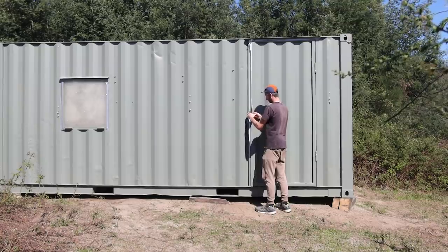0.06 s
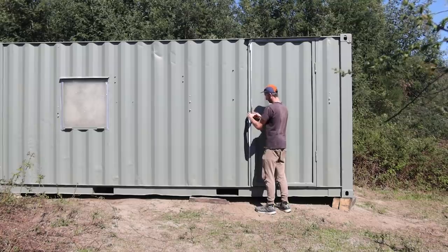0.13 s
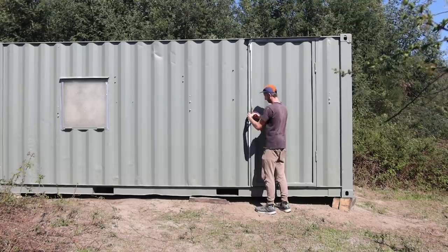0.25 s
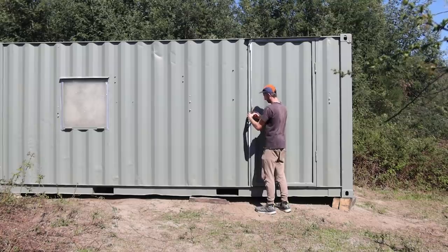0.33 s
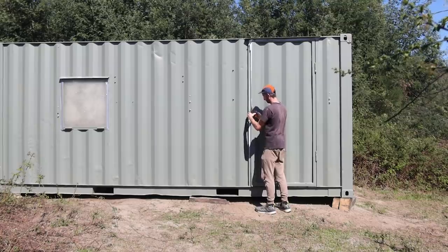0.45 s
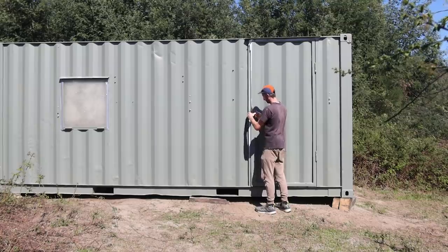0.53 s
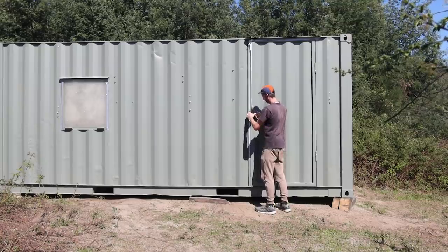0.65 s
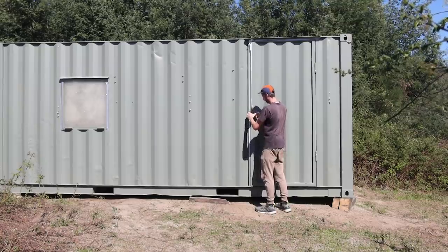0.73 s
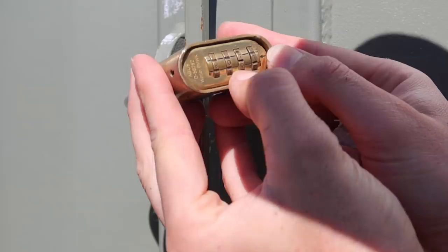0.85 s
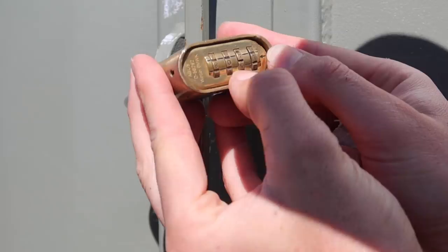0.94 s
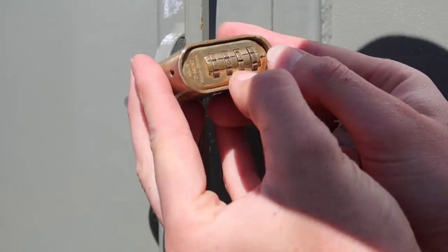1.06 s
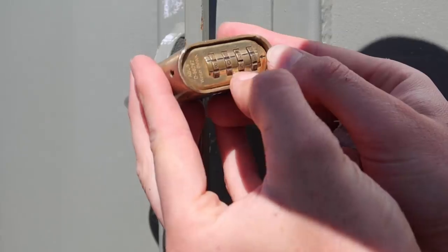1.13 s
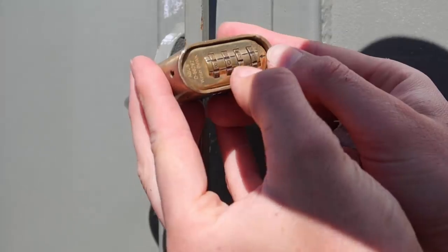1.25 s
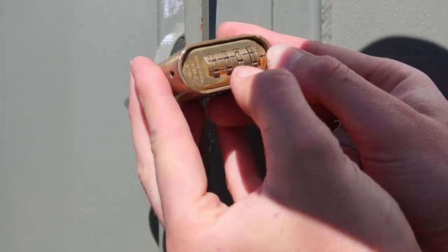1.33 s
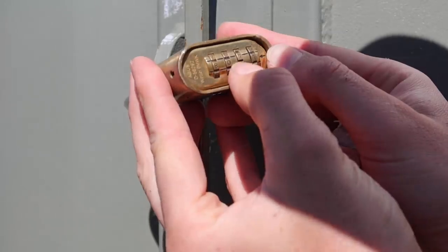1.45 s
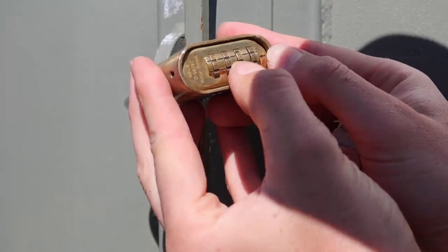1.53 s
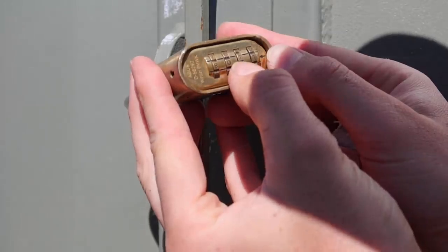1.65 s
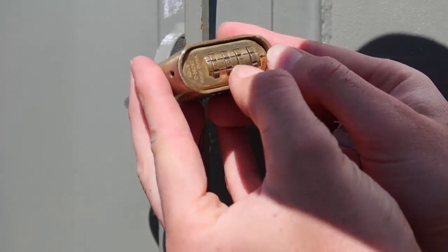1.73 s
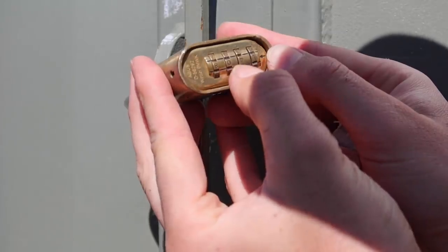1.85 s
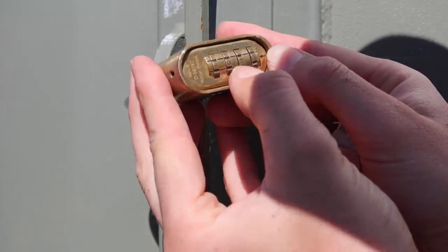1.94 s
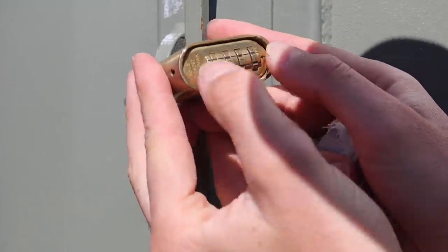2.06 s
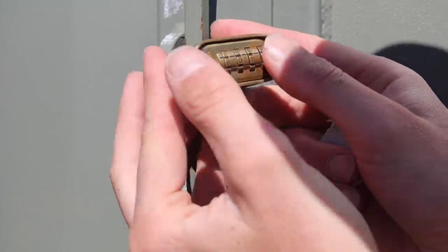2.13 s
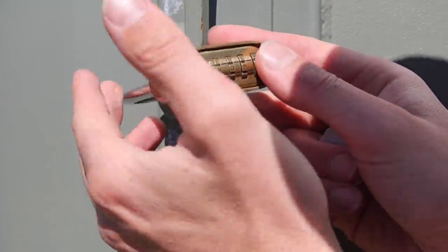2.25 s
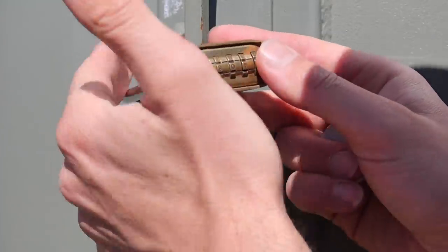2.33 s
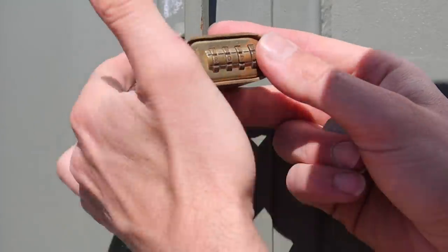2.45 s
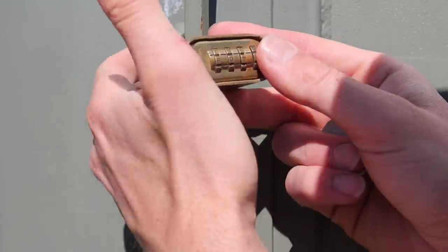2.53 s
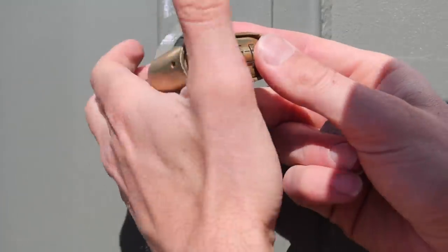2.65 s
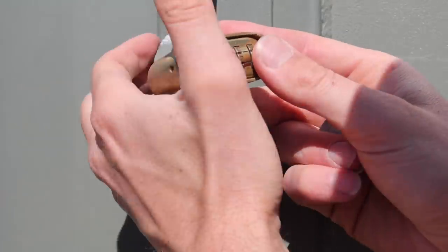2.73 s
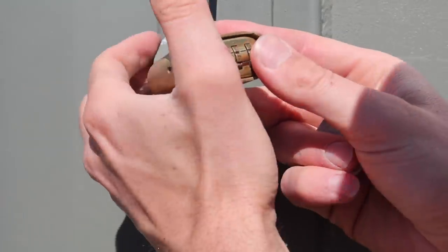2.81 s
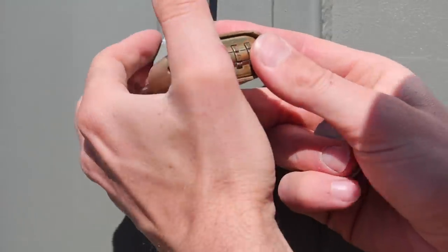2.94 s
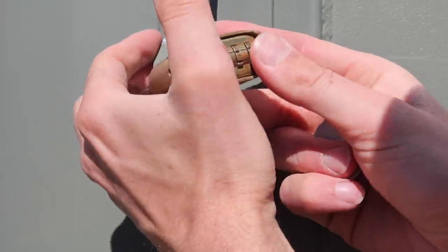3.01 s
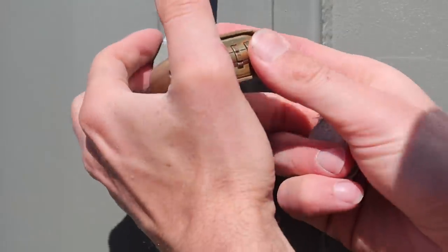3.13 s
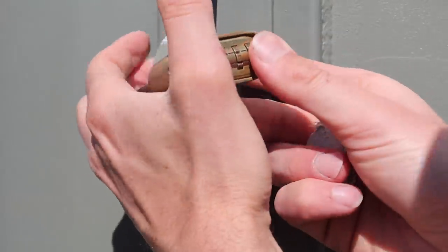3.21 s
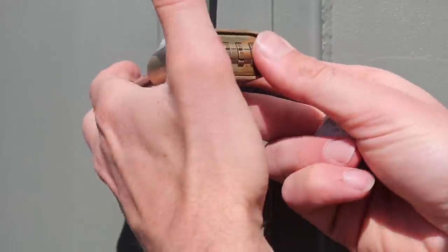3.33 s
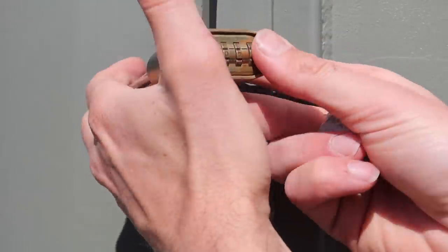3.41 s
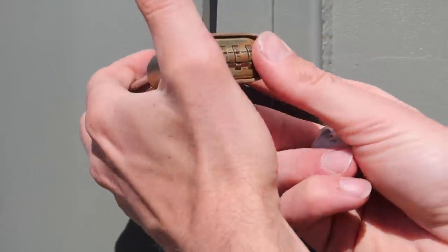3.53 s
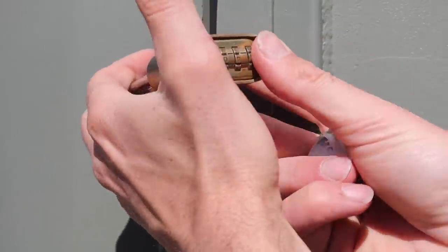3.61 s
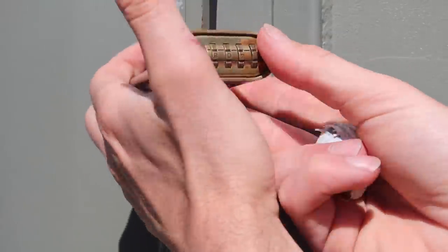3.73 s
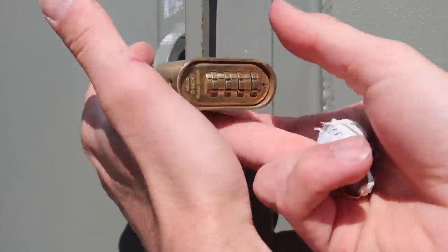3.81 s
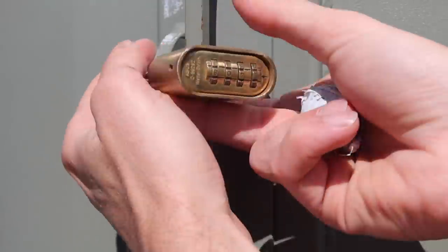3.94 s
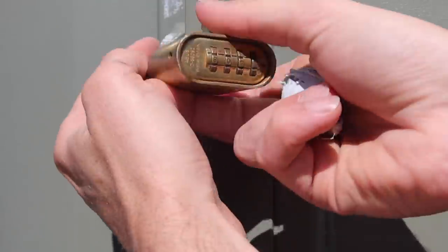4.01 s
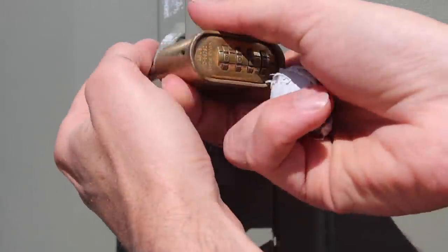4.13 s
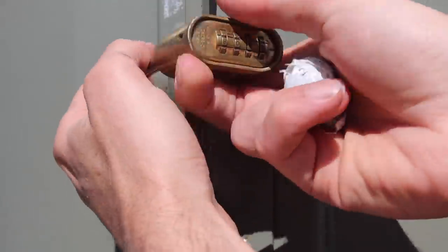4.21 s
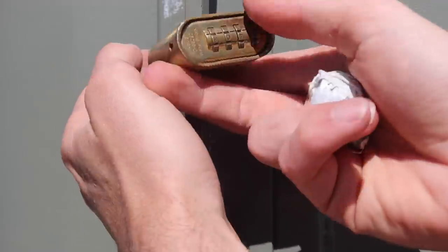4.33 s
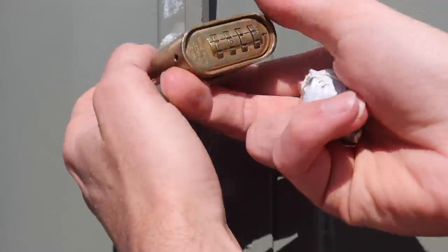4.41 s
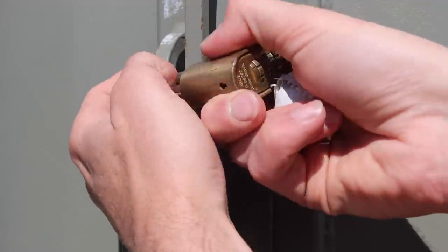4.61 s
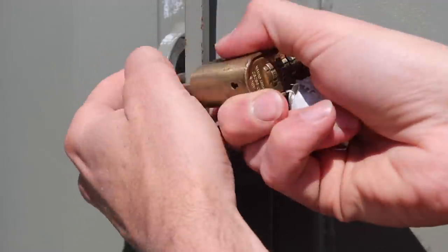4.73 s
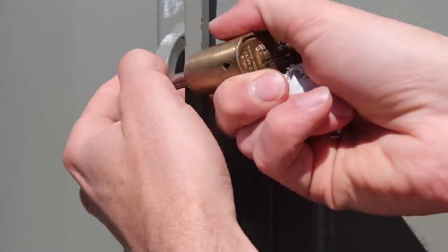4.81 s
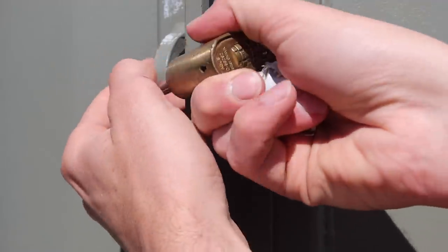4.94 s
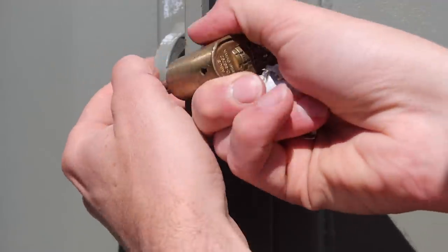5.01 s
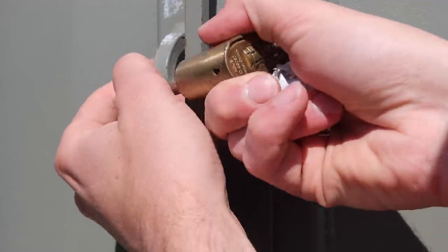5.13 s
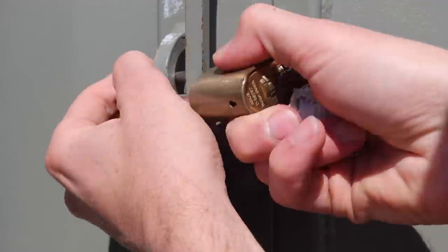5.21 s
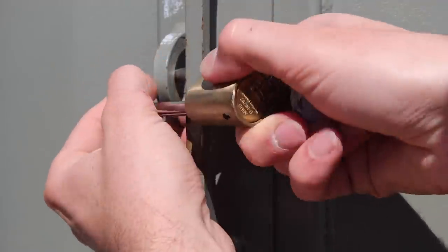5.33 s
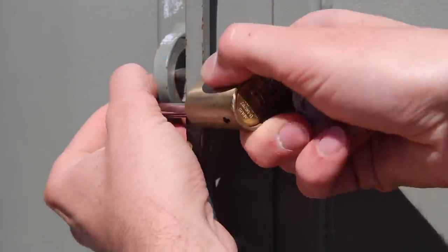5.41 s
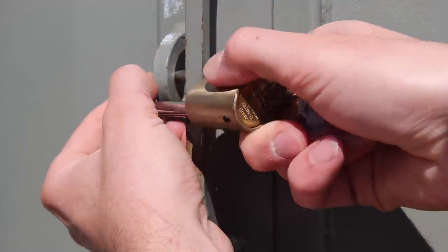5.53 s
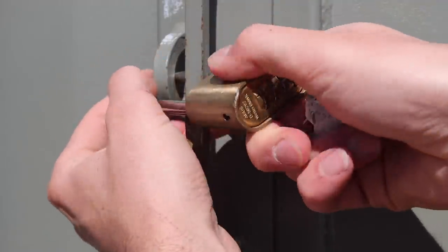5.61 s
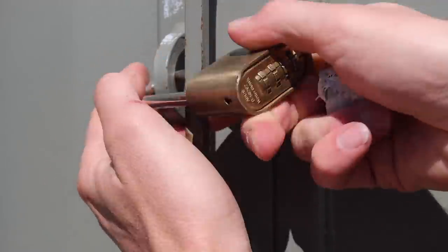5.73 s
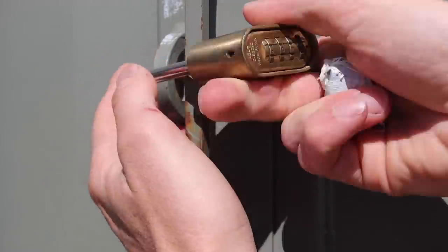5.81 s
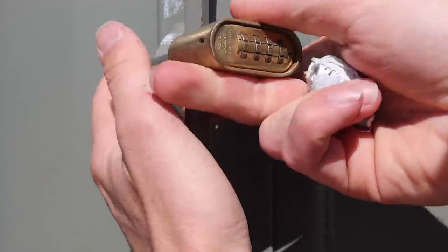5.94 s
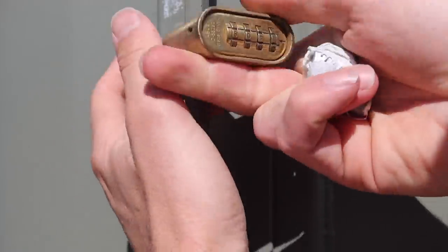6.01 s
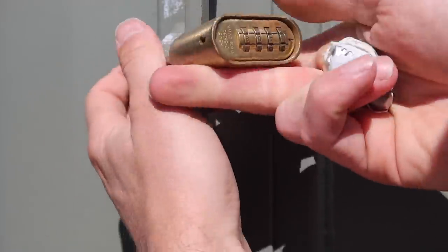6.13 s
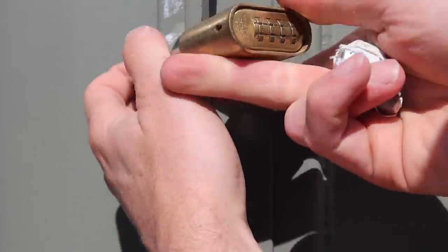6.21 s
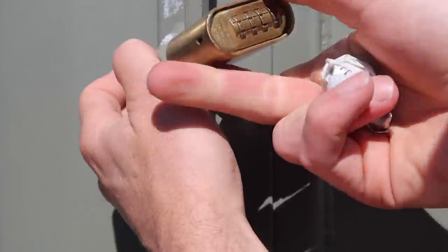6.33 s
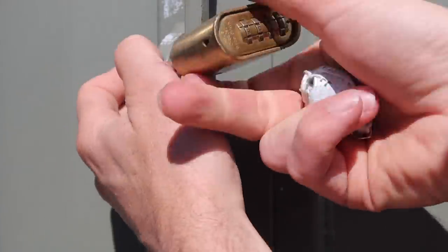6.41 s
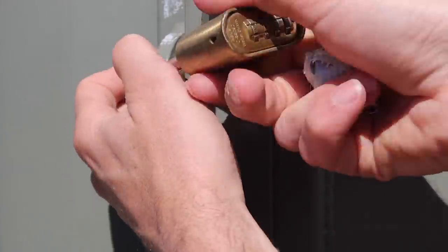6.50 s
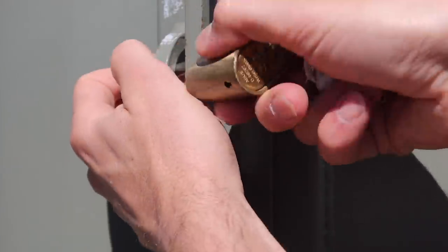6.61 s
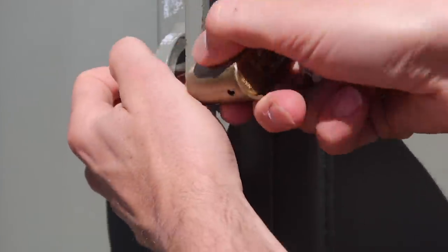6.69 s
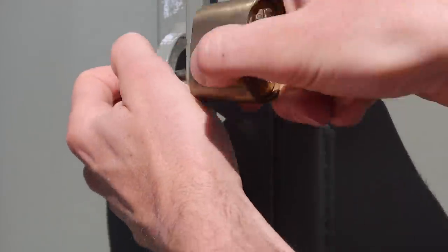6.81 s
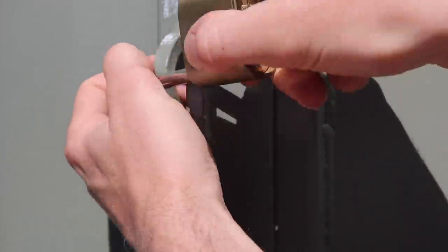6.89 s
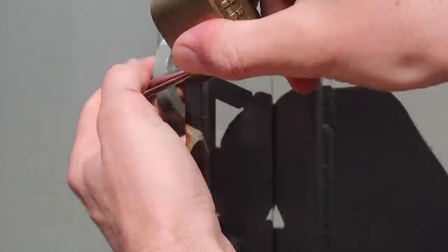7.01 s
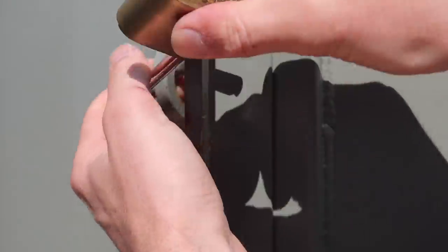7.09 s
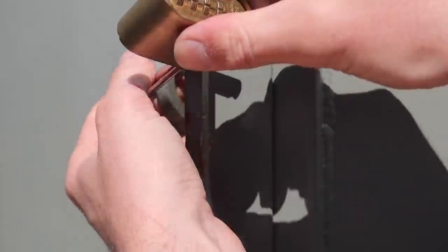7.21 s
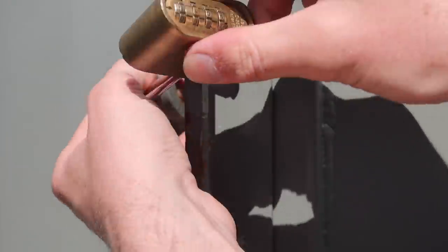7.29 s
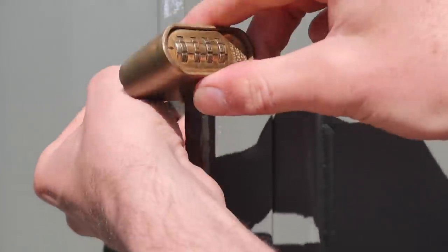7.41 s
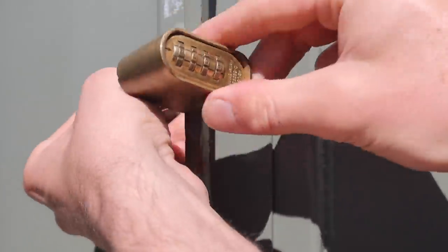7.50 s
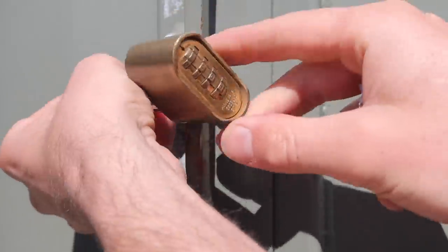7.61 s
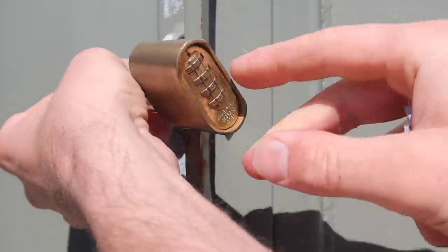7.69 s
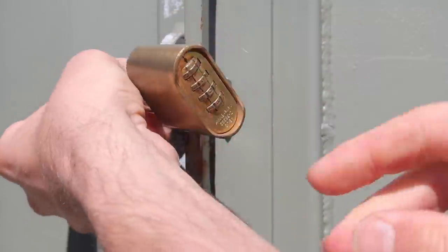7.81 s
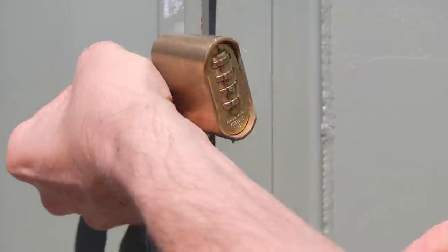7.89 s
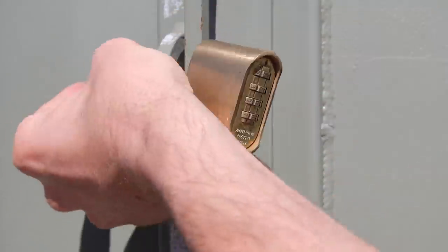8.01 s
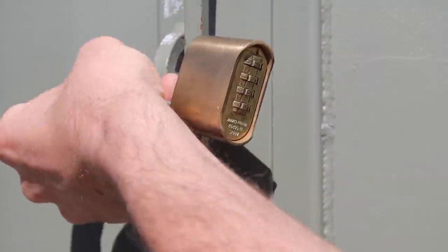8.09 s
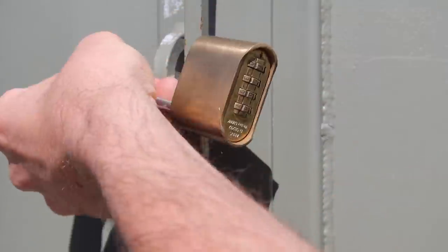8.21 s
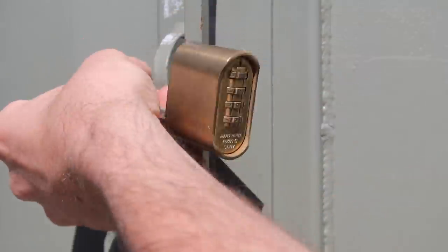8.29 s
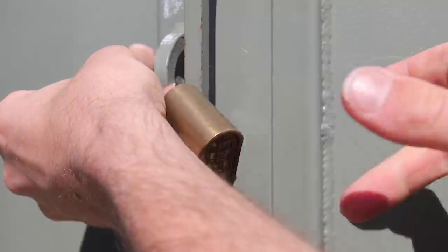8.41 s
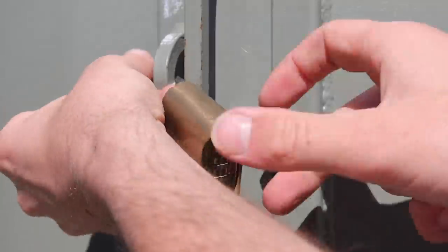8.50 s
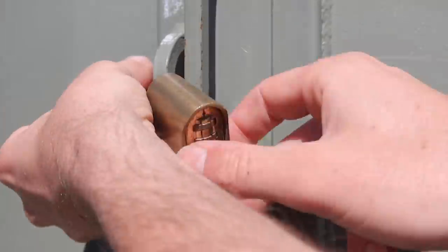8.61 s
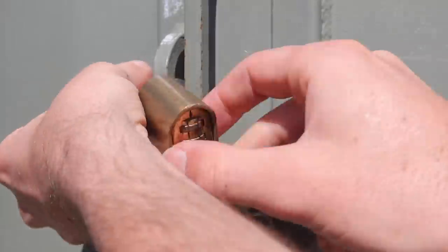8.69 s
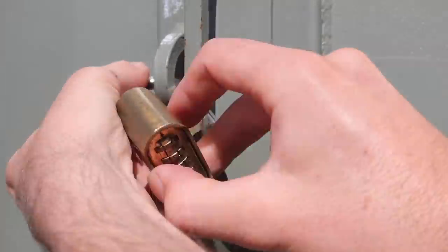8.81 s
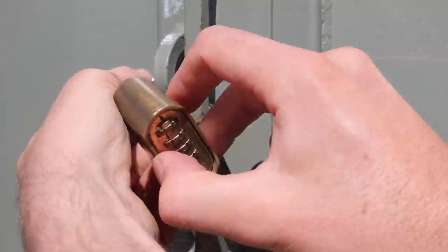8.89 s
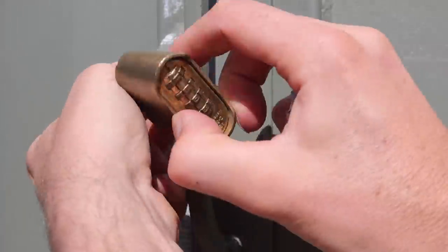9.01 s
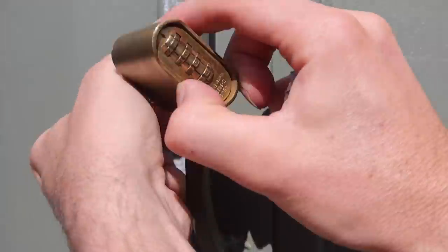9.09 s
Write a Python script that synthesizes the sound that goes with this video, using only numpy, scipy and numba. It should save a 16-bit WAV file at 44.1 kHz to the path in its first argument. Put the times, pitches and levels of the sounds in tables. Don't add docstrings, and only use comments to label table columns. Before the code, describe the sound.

A heavy brass padlock knocks, scrapes and clanks against a steel door latch outdoors, hollow metal panel ringing, faint breeze and birds.

```python
import sys
import numpy as np
from numba import njit
from scipy import signal
from scipy.io import wavfile
from scipy.ndimage import uniform_filter1d

SR = 44100
rng = np.random.default_rng(int(sys.argv[2]) if len(sys.argv) > 2 else 0)


def master(y):
    cut = np.clip(np.atleast_2d(y).T, -1, 1)
    pcm = np.round(cut * 32767)
    wavfile.write(sys.argv[1], SR, pcm.astype(np.int16))


def level_to_linear(level):
    exponent = np.asarray(level, float) / 20
    return 10 ** exponent


N = 403515


def level(x, db):
    return x * level_to_linear(db) / np.sqrt(np.mean(x ** 2))


def on_log(hz, table):
    rows = np.array(table)
    return np.interp(np.log(hz), np.log(rows[:, 0]), rows[:, 1])


def band(x, hz, width):
    return signal.lfilter(*signal.iirpeak(hz, hz / width, SR), x)


def steep(x, hz, width):
    return band(band(x, hz, width), hz, width)


def walk(rate):
    hold = int(SR / rate)
    steps = np.repeat(rng.standard_normal(N // hold + 1), hold)
    return 1.87 * uniform_filter1d(uniform_filter1d(steps, hold), hold)[:N]


def ports(x):
    return np.array([level_to_linear(-1.5) * np.r_[0, x[0, :-1]], level_to_linear(-0.2761) * x[1]])


def swells(table, rise, rest_db):
    t = np.arange(N) / SR
    peaks = [db - 12 * np.maximum((s - t) / (rise * fade_s), (t - s) / fade_s) for s, db, fade_s in table]
    return np.max(peaks + [rest_db + 0 * t], axis=0)


def outdoors():
    # (frequency [Hz], density [dB per Hz])
    air_colour = [(35, -36), (60, -14), (135, -7.5), (190, -17), (295, -8), (339, -18.5), (448, -15),
                  (526, -8), (727, -14), (875, -14.5), (1360, -17.5), (2590, -21.5), (5060, -26),
                  (15000, -45.5)]
    # (frequency [Hz], side minus mid [dB])
    air_side = [(60, -21), (110, -9), (200, -1.5), (380, 3), (700, 2.5), (1290, 1), (2380, -2),
                (4390, -2.5), (8110, -4), (15000, -2)]
    # (peak time [s], level [dB], 12 dB fade [s])
    bumps = [(0, -50, -1), (.61, -39, .35), (.82, -39.5, .35), (1.35, -41, 0.66), (1.56, -41.5, 0.5),
             (1.85, -37, 0.12), (2.03, -45, 5)]
    # (peak time [s], level [dB], 12 dB fade [s])
    gusts = [(.48, -40, 0.44), (1.45, -50.5, .25), (2.2, -50.5, 0.39), (2.9, -48.5, 1.5),
             (4.05, -43.5, 1.02), (4.87, -38, 0.41), (5.8, -38.5, 0.61), (7.11, -34, 0.974),
             (9.1, -49.5, 0.59)]
    low, high, swell = 0, 0, walk(1.0)
    for hz in 45 * 2 ** np.arange(0, 8.3, .5):
        mid, side = steep(rng.standard_normal((2, N)), hz, hz / 2)
        side = side * level_to_linear(on_log(hz, air_side))
        air_db = on_log(hz, air_colour) + 2.2 * swell * (hz < 500) + 1.0 * walk(13)
        air = level_to_linear(air_db) * np.array([mid + side, mid - side])
        if hz < 500:
            low = low + air
        else:
            high = high + air
    rumble = level(low, 0) * level_to_linear(swells(bumps, 0.158, -46.5))
    leaves = level(high, 21.25) * level_to_linear(-72)
    wind = level(steep(rng.standard_normal(N), 33, 30), -1.4) * level_to_linear(swells(gusts, 0.37, -63))
    return rumble + leaves + wind


def bird_notes(table):
    t = np.arange(N) / SR
    for start, length, hz, db in table:
        yield hz, level_to_linear(db) * np.sin(np.pi * np.clip((t - start) / length, 0, 1)) ** 0.38


def birds():
    # (time [s], pitch [Hz], level [dB])
    warble = [(.04, 3650, -56), (.047, 3640, -53.5), (.06, 3666, -49), (.068, 3805, -49.5),
              (.09, 3670, -53.5), (.095, 3700, -63.5)]
    # (start [s], length [s], pitch [Hz], level [dB])
    peeps = [(.015, 0.0336, 4340, -58), (.09, 0.0334, 4330, -54)]
    # (start [s], length [s], pitch [Hz], level [dB])
    buzzes = [(5.17, 0.08, 7100, -63), (5.41, 0.11, 7170, -62), (5.71, 0.122, 7290, -58),
              (5.92, 0.107, 7500, -57.5), (6.13, 0.122, 7630, -59.5), (6.33, .1, 7750, -58),
              (7.39, 0.095, 6900, -58)]
    t = np.arange(N) / SR
    s, pitch, loudness = np.transpose(warble)
    hz = np.interp(t, s, pitch, -110, -110) + 170 * np.sin(2 * np.pi * 48 * t)
    db = np.interp(t, s, loudness, -110, -110)
    near = np.sqrt(2) * uniform_filter1d(level_to_linear(db), size=200) * np.sin(2 * np.pi * np.cumsum(hz) / SR)
    near += sum(env * np.sin(2 * np.pi * f * t) for f, env in bird_notes(peeps))
    noise = rng.standard_normal((2, N))
    far = sum(env * level(steep(noise, f, 350), 0) for f, env in bird_notes(buzzes))
    return near * np.array([[1.1], [.9]]) + far


def ticks():
    # (time [s], level [dB], pitch [Hz])
    dry_ticks = [(0.1922, -36.5, 5560), (2.8884, -19.5, 3580), (2.9611, -41, 3600), (3.5515, -29, 4640),
                 (5.015, -31, 10930), (5.062, -17.5, 11460), (5.062, -18.5, 4330), (5.2578, -11.5, 4330),
                 (5.3727, -33.5, 4610), (5.477, -29, 3650), (5.6546, -44.5, 4180), (6.0388, -36.5, 4070),
                 (6.9196, -6.5, 3680), (7.45, -33.5, 4300), (7.6432, -36, 3620), (8.384, -35, 4400),
                 (8.482, -41, 12500), (3.932, -14, 12040), (8.2146, -16, 11000), (3.586, -26, 12020),
                 (8.6644, -46.5, 4100), (8.045, -15, 11000), (8.854, -26, 8300), (3.655, -18, 12500)]
    out, t = np.zeros(N), np.arange(int(.03 * SR)) / SR
    for s, db, hz in dry_ticks:
        noise = rng.standard_normal(len(t))
        snap = band(noise * np.exp(-t / .002), hz, .9 * hz)
        i = int(s * SR)
        out[i:i + len(t)] += level_to_linear(db - 10.5) * snap / np.abs(snap).max()
    return ports(np.array([out, out]))


def strengths(hz, scatter):
    part_hz = [100, 420, 1800, 4200, 9500]
    part_db = [-3, -2.5, -6.5, -1, 4.5]
    # (time [s], hasp [dB], panel over hasp [dB], brass over hasp [dB], edge over kind [dB])
    shoves = [(0.9251, -38, 0, -13.5, -8.5), (2.829, -23.5, -3.5, -17, -2.5), (2.961, -43, 3.5, -2.5, -6),
              (3.3073, -31, -5, 0.5, 4), (3.3885, -27.5, -4, -10.5, 1.5), (3.5549, -27, 0.5, -12.5, -0.5),
              (3.9768, -33.5, 0, -26, -1), (4.349, -25, 9.5, -22.5, 3), (5.729, -45, -6, -4.5, -0.5),
              (5.7502, -20, -12, -6.5, -5), (6.1974, -17.5, -19.5, -9.5, 3), (6.284, -25.5, -3, -1.5, -1),
              (6.3461, -20, -10, -6, -2), (6.575, -22.5, -5, -32.5, -0.5), (6.9273, 1, -17.5, -6.5, 1.5),
              (7.4514, -42, 11, -5.5, -7.5), (8.28, -25.5, -5, -35, -1), (8.3847, -21, -9, -15.5, 2),
              (8.664, -43, 5.5, -26.5, -1)]
    clacks = [(0.2023, -40.5, 7.5, -11.5, 0.5), (1.8398, -38, -5.5, -10.5, -1.5), (2.594, -22, -1, -19, -1),
              (2.7389, -24, 9.5, -39, -2), (4.752, -6, -6, -1.5, 0.5), (4.986, -14.5, -8.5, 0, -3.5),
              (5.0605, -31, 18.5, -18, 0.5), (5.168, -60, 22.5, -18.5, -1), (5.2757, -7.5, -8.5, 0, -5.5),
              (5.8728, -36, 8.5, -14, -0.5), (5.91, -23.5, -5, -21, 0.5), (6.3976, -14, -13.5, -10, -1),
              (6.6211, -13.5, -9, -1.5, -3.5), (6.789, -7.5, -3.5, 2, -2), (8.02, -28, 7.5, -11, 1.5),
              (8.044, -12, 3, 9.5, 0), (8.97, -43, 6, -1.5, -0.5)]
    raps = [(2.089, -43.5, 9, -15.5, -1), (2.2551, -21, 2, -28, 0.5), (2.5516, -18, -1, -16, -0.5),
            (3.197, -40, 2.5, -18.5, -1), (3.5212, -36, 2, -8, 2), (3.932, -3.5, -13, -3.5, 0.5),
            (4.6499, -26, -2.5, -22, -0.5), (4.77, -3.5, -6.5, -0.5, -2), (5.307, -12, -1, 0, -4.5),
            (5.3725, -24.5, -6.5, 3, -6.5), (5.6536, -46, 18.5, 2, 0.5), (6.133, -6.5, -15.5, -14.5, -0.5),
            (6.7677, -11, -2.5, -9.5, -2), (7.122, -18, 0, -11, 0.5), (7.4753, -32, 2.5, -43, -1),
            (8.1415, -22, 1, -10, 1), (8.147, -15, -3, -16, -3), (8.2146, -1, -9, -15, -11),
            (8.606, -38, 12.5, -26.5, -1)]
    thuds = [(2.6567, -17.5, -9.5, -10.5, 0.96), (4.41, -13, 3, -23.5, 0.98), (4.675, -16.5, 8.5, -17.5, 1),
             (6.6868, -11.5, 2, -12.5, 0.85), (7.664, -28.5, 4, -12, 1), (8.443, -23, -10.5, -17.5, 1),
             (8.8529, -16, -12, -4.5, 6)]
    snaps = [(0.1924, -40.5, 4.5, 3.5, -1.5), (2.5005, -37.5, 2.5, -29.5, -1), (2.8906, -33, -6.5, -11, -1),
             (3.064, -30, 4, -4.5, -1), (3.5874, -15, -3, -1, 0.92), (3.6306, -33, 14, -8, 1),
             (3.655, -14, -15.5, 2, 3), (3.8435, -28.5, -1, -1, -1.7), (4.251, -48, 10, -4.5, -1),
             (5.008, -28, -16.5, -5, -1), (5.258, -29, -10.5, -2, -1), (5.474, -59, 6.5, -9, -1),
             (5.6776, -41, 15, -14, -1), (6.038, -30, 0, -12.5, -1), (6.9187, -13, -3.5, -17.5, -0.79),
             (7.397, -48.5, 13, -14.5, -1)]
    more_knocks = [(2.474, -42, 0, -13, 0), (2.564, -20.5, -4, -27.5, -1), (2.818, -34, -1.5, -21, -1),
                   (3.5323, -33.5, -2, -7.5, 3), (3.5931, -17, -5, -8, 4.5), (3.6648, -12, -13.5, 1.5, 9),
                   (3.849, -30.5, -3, -5.5, -0.5), (4.4156, -20.5, -2, -16, -4), (4.5627, -37.5, -2, -8.5, -2),
                   (4.6354, -34.5, -1, -11.5, 7), (6.2076, -20, -14.5, -12, -2), (7.309, -50.5, -1.5, -22, -1),
                   (7.5289, -39.5, -0.5, -6.5, 0), (7.564, -33.5, -1.5, -10.5, -2),
                   (7.6423, -30, -2.5, -11, -3.5), (7.684, -33.5, 9, -14, -2), (7.704, -38, 6.5, -13, -1),
                   (7.7769, -43.5, 8.5, -5.5, 0), (7.797, -45.5, 16, -7, -1), (8.012, -38, 3.5, -7.5, 0),
                   (8.506, -33, -3, -14.5, -5), (8.736, -50.5, 3.5, -11, -2), (9.04, -43, 3.5, -13, -0.5),
                   (2.865, -35.5, 6, -10, -1)]
    # (boom over panel [dB], bright tick over brass [dB])
    kinds = [
        (-5.5, -23),
        (-13, -21.5),
        (-21, -23.5),
        (-12.5, -35.5),
        (-6.5, -11),
        (-15.5, -21),
    ]
    tables = (shoves, clacks, raps, thuds, snaps, more_knocks)
    rows = np.array([row + kind for table, kind in zip(tables, kinds) for row in table])
    s, hasp, panel, brass, edge, boom, tick = rows[np.argsort(rows[:, 0])].T
    parts = hasp[:, None] + np.c_[panel + boom, panel, 0 * s, brass, brass + tick + edge] + part_db
    colour = np.array([np.interp(np.log(hz), np.log(part_hz), p) for p in parts])
    return (s * SR).astype(np.int64), colour, scatter * rng.standard_normal(colour.shape)


@njit(fastmath=True)
def ring(at, kick, re, im, leak, left, right, length):
    out, e, m = np.zeros((2, length)), 0, len(re)
    a, b, c, d = np.zeros(m), np.zeros(m), np.zeros(m), np.zeros(m)
    for i in range(at[0], length):
        while e < len(at) and at[e] == i:
            c += kick[e]
            e += 1
        l, r = 0., 0.
        for k in range(m):
            u, v = a[k] + leak[k] * c[k], b[k] + leak[k] * d[k]
            s, t = (1 - leak[k]) * c[k], (1 - leak[k]) * d[k]
            a[k], b[k] = u * re[k] - v * im[k], u * im[k] + v * re[k]
            c[k], d[k] = s * re[k] - t * im[k] + 1e-20, s * im[k] + t * re[k]
            l += left[0, k] * b[k] + left[1, k] * a[k]
            r += right[0, k] * b[k] + right[1, k] * a[k]
        out[0, i], out[1, i] = l, r
    return out


def door(count=130):
    # (frequency [Hz], level over neighbours [dB], t60 [s])
    panel_modes = [(34.9, -8.5, 1.3), (91.854, 3, 2.3), (192.42, 11, 0.697), (235.33, 9, 1.096),
                   (284.9, 8.5, 0.663), (333.6, 6.5, 0.17), (395.9, -1, 1.43), (462.27, 12.5, 0.274),
                   (526.3, 16, 0.103), (499.7, 10, 0.223), (665.6, 11, 0.201), (764.8, 9.5, 0.185),
                   (820.6, 9, 0.206), (950, 3, 0.294)]
    hasp_modes = [(1180, -22, 0.84), (1500, -7.5, 0.067), (1696, 8, .13), (1713.7, 16, 0.098),
                  (1789, 13, 0.1133), (1871, 7.5, 0.2), (1943, 10.5, 0.176), (4100, -1.5, .1),
                  (4148, -7, .15)]
    lock_modes = [(1287.3, 1.5, 0.26), (2036, -5.5, 0.091), (2325, -3.5, 0.123), (2617.4, 2, 0.05),
                  (2856, 4, 0.0592), (3180, -16, 0.15), (3326, -7.5, 0.13), (3731, -1.5, 0.1),
                  (4686, -3, 0.13), (5484, -6, .08), (5865, -11.5, 0.092), (6570, 0, 0.095),
                     (7500, -19, 0.054), (8060, 3, 0.069), (8820, -4.5, 0.036), (10290, 3.5, 0.049)]
    # (frequency [Hz], t60 [s])
    plain_decay = [(60, 0.515), (260, 0.778), (700, 0.291), (1300, 0.205)]
    place = (np.arange(count) + rng.random(count)) / count
    plain_hz = 70 + 900 * place ** 1.5
    strong_hz, strong_db, strong_t60 = np.transpose(panel_modes + hasp_modes + lock_modes)
    hz = np.r_[plain_hz, strong_hz]
    linger = np.clip(np.exp(0.804 * rng.standard_normal(count)), .3, 1.2)
    t60 = np.r_[on_log(plain_hz, plain_decay) * linger, strong_t60]
    t60 = np.minimum(t60, 340 / hz)
    at, colour, chance = strengths(hz, 0.99)
    colour += np.r_[np.zeros(count), strong_db] - 7 * np.log10(np.minimum(hz / 1000, 1))
    colour += 9 * (hz > 2000) - 18.5
    firm = (hz < 300) | (np.arange(len(hz)) >= count)
    steady = np.sign(chance) * (0.634 + 0.399 * np.abs(chance))
    kick = level_to_linear(colour) * np.where(firm, steady, chance)
    pole = np.exp(2j * np.pi * hz / SR - np.log(1000) / (t60 * SR))
    rise_s = 0.000794 + 0.33 / hz
    leak = 1 - np.exp(-1 / (rise_s * SR))
    lag = np.exp(-1j * hz / SR * 2.0 + .05j * rng.standard_normal(len(hz)))
    left, right = level_to_linear(-1.05) * lag, level_to_linear(-0.53) / lag
    left, right = np.array([left.real, left.imag]), np.array([right.real, right.imag])
    return ring(at, kick, pole.real.copy(), pole.imag.copy(), leak, left, right, N)


def fade(power, t60, step):
    return signal.lfilter([1], [1, -np.exp(-2 * np.log(1000) * step / (t60 * SR))], power)


def clatter():
    # (frequency [Hz], colour [dB], first fall t60 [s], late tail t60 [s], tail [dB])
    clatter_bands = [(666, -13, 0.09, 0.997, -3.5), (995, -1.5, 0.071, 0.469, -11.5),
                     (1488, -2, 0.156, 0.604, -8), (1677, 2.5, 0.138, 0.35, -6),
                     (2107, -2, 0.1036, 0.364, -5), (3220, -2, 0.0513, 0.245, -6.5),
                     (4080, -2.5, 0.069, 0.2394, -12), (5880, -2, 0.0366, 0.091, -3),
                     (9930, 3, 0.024, 0.09, -15), (14100, -7, 0.011, .025, -24)]
    step = 16
    centres = 700 * 2 ** np.arange(0, 4.5, .2)
    at, colour, chance_db = strengths(centres, 2.614)
    colour += chance_db
    table, out = np.array(clatter_bands), 0
    rattle = level_to_linear(2 * 0.896 * walk(120)[::step])
    for hz, knock_db in zip(centres, colour.T):
        tone_db, first, late, tail_db = (on_log(hz, table[:, [0, c]]) for c in range(1, 5))
        hits = np.zeros(len(rattle))
        np.add.at(hits, at // step, level_to_linear(2 * (knock_db + tone_db - 10.0)))
        tail = level_to_linear(2 * tail_db) * rattle * fade(hits, late, step)
        power = fade(hits, first, step) + tail
        swell = 1 - np.exp(-step / ((0.00388 + 5.3 / hz) * SR))
        env = np.sqrt(signal.lfilter([swell], [1, swell - 1], power))
        env = np.interp(np.arange(N) / step, np.arange(len(env)), env)
        mid, side = level(steep(rng.standard_normal((2, N)), hz, hz / 6.01), 0)
        side = side * level_to_linear(-10.0) * np.sqrt(hz / 8000)
        out = out + env * np.array([mid + side, mid - side])
    return ports(out)


def pings():
    # (time [s], level [dB], pitch [Hz], t60 [s])
    loose_rings = [(.926, -41.5, 2100, 0.079), (1.841, -39, 1800, 0.102), (2.892, -44, 3100, .12),
                   (3.065, -24, 1350, 0.15), (3.065, -34, 2950, 0.07), (5.675, -49, 2300, 0.145),
                   (6.133, -11.5, 1710, 0.174), (6.399, -20.5, 1800, 0.185), (6.928, -3.5, 1700, 0.16),
                   (3.934, -13, 2050, .22), (5.0612, -36, 9950, .022), (3.5882, -26, 8050, .07),
                   (3.5882, -26.5, 5850, .065), (3.6662, -21, 4650, .055), (3.6662, -29, 10100, .055),
                   (7.4472, -42, 4200, .065), (5.3072, -31, 8150, .075), (8.4842, -52, 4500, .09),
                   (.9262, -49, 3020, .075), (.1935, -46, 5500, .06), (8.045, -12, 1720, .15),
                   (3.934, -10, 1600, .12), (8.854, -20, 1750, .15), (8.854, -29, 4000, .1),
                   (8.854, -33, 4900, .08), (6.623, -17, 1720, .15), (6.688, -18, 1860, .15),
                   (6.577, -30, 1720, .15), (2.657, -32, 2900, .06), (8.046, -18, 4300, .08),
                   (4.46, -59, 4330, 0.65), (2.553, -41, 4650, .1)]
    # (time [s], level
    # [dB], pitch [Hz], t60 [s])
    thumps = [(2.553, -18, 699.6, 0.16), (3.933, -10.5, 501.8, 0.11), (4.753, -10, 509, 0.062),
              (5.312, -23, 338, .95), (2.555, -18, 182, .28), (6.687, -12, 475.3, .14),
              (6.786, -6, 474.6, 0.098), (8.045, -11, 706, .1), (8.045, -4, 205, .075),
              (8.146, -9.5, 776.5, .12), (8.216, -7, 790, 0.17), (5.33, -14, 288, .9), (3.6, -22, 90, .9),
              (4.41, -16, 91, .9), (5.07, -26, 91, .9), (6.705, -21, 95, .5), (8.15, -22, 91, 1.1),
              (2.74, -20, 195, .3), (5.062, -19, 500, .2), (6.93, -14, 500, .15), (7.668, -29, 950, .2),
              (3.39, -32, 330, .4), (5.31, -27, 98, .6), (6.995, -17, 108, .3), (8.22, -24, 392, .9),
              (8.22, -25, 290, .9), (4.677, -16, 600, .12), (5.68, -28, 94, 1.), (5.066, -21, 192, .6),
              (4.68, -20, 190, .8), (5.32, -25, 478, .9), (8.23, -22, 950, .45)]
    out = np.zeros(N + 2 * SR)
    for s, db, hz, t60 in loose_rings + thumps:
        t = np.arange(int(min(t60, 1.5) * SR)) / SR
        pair = sum(np.sin(2 * np.pi * hz * (1 + .015 * c) * t) for c in rng.uniform(-1, 1, 2))
        chord = .6 * np.sin(2 * np.pi * hz * t) + .3 * pair
        swell = 1 - np.exp(-t * hz / 1.5)
        i = int(s * SR)
        out[i:i + len(t)] += level_to_linear(db - 60 * t / t60) * swell * chord
    return ports(np.array([out[:N], out[:N]]))


def blows():
    # (time [s], level [dB], pitch [Hz])
    contacts = [(5.306, 1, 420), (6.687, -4, 400), (6.786, -2, 520), (2.741, -13, 330), (4.752, -7, 580),
                (4.678, -12, 330), (5.064, -14, 300), (2.595, -15, 520), (.238, -30, 330)]
    out, t = np.zeros(N), np.arange(int(.06 * SR)) / SR
    for s, db, hz in contacts:
        env = level_to_linear(db + 6 - 60 * t * hz / 9.0) * (1 - np.exp(-t * hz / .6))
        i = int(s * SR)
        out[i:i + len(t)] += env * np.sin(2 * np.pi * hz * t)
    return ports(np.array([out, out]))


def knocks():
    return door() + clatter() + ticks() + blows()


def scrape():
    # (frequency [Hz], width [Hz], level [dB])
    grind = [(868, 218, -0.5), (1376, 330, -13.5), (1760, 258, -2.5), (2284, 270, -9), (2854, 340, -10)]
    hiss = [(3035, 240, -0.5), (3964, 260, -0.5), (4330, 170, 0), (6900, 900, -19)]
    drone = [(195.5, 77, 1.5), (279.6, 33.4, 4.5), (398.9, 26.3, 7), (491.9, 80.4, 2), (641.8, 126, -2.5)]
    rasp = [(2300, 500, 0), (2900, 450, -2)]
    # (start [s], length [s], grind [dB], hiss [dB], drone [dB], rasp [dB] if dragged hard)
    strokes = [(2.431, 0.21, -47.5, -60.5, -40), (2.74, 0.154, -52.5, -65, -30),
               (2.828, .1, -44, -46, -45.5), (3.306, 0.271, -40.5, -64.5, -30.5),
               (3.526, 0.101, -35.5, -41.5, -36), (3.658, 0.261, -53.5, -51, -31),
               (3.876, 0.074, -43, -52, -33.5), (4.142, 0.385, -52, -73, -35),
               (5.75, 0.426, -41.5, -50.5, -29), (7.461, 0.385, -44, -45.5, -35.5),
               (7.663, 0.27, -49, -57.5, -33), (7.562, 0.152, -36, -60, -36.5),
               (7.99, 0.079, -39.5, -53.5, -26), (8.22, 0.12, -28, -60, -47.5, -30),
               (8.3, .085, -33, -64, -42, -42), (8.425, 0.18, -56, -55.5, -24.5),
               (8.619, 0.127, -61.5, -68, -38.5), (8.73, 0.177, -59, -56, -39.5),
               (8.93, 0.248, -56, -65, -42), (4.178, 0.079, -53, -58.5, -54),
               (4.623, 0.282, -28.5, -42.5, -46.5)]
    unevenness = 2.25 * rng.exponential(size=N) + np.clip(1.87 * walk(60), -4, 4)
    slips = rng.standard_normal(N) * level_to_linear(unevenness)
    t = np.arange(N) / SR
    arcs = np.array([np.sin(np.pi * np.clip((t - s) / length, 0, 1)) ** 0.404 for s, length, *_ in strokes])
    gains = level_to_linear([(*row, -99)[2:6] for row in strokes]).T
    rub = 0
    for modes, env in zip((grind, hiss, drone, rasp), gains @ arcs):
        tone = sum(level_to_linear(db) * band(steep(slips, hz, width), hz, 3 * width) for hz, width, db in modes)
        rub = rub + env * level(tone, -7)
    return ports(np.array([rub, rub]))


@njit
def limiter(x, top, attack, release):
    gain, e = np.empty(len(x)), 0.
    for i in range(len(x)):
        e += (x[i] - e) * (attack if x[i] > e else release)
        gain[i] = min(1., top / (e + 1e-9))
    return gain


def scene():
    near = knocks() + scrape() + pings()
    duck = limiter(np.abs(near[0]), 0.07, 0.00033, .00004) ** 0.5
    return near + birds() + outdoors() * duck


def low_pass(x):
    return signal.sosfilt(signal.butter(12, 15570, fs=SR, output="sos"), x)


def record(dry):
    gain = limiter(np.abs(dry).max(axis=0), 0.423, 0.00532, 0.00022)
    x = np.clip(dry * gain, -1.2, 1.2)
    x = signal.sosfilt(signal.ellip(8, .2, 60, 15400, fs=SR, output="sos"), x)
    return low_pass(np.clip(x, -1, 1))


dry = scene()
out = record(dry)
master(out)
```